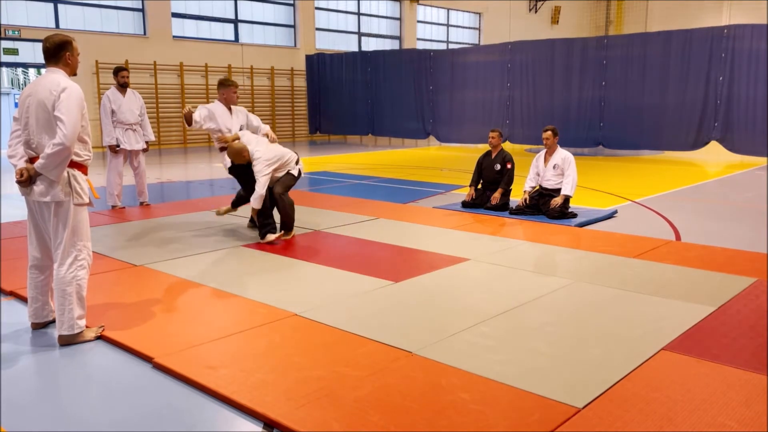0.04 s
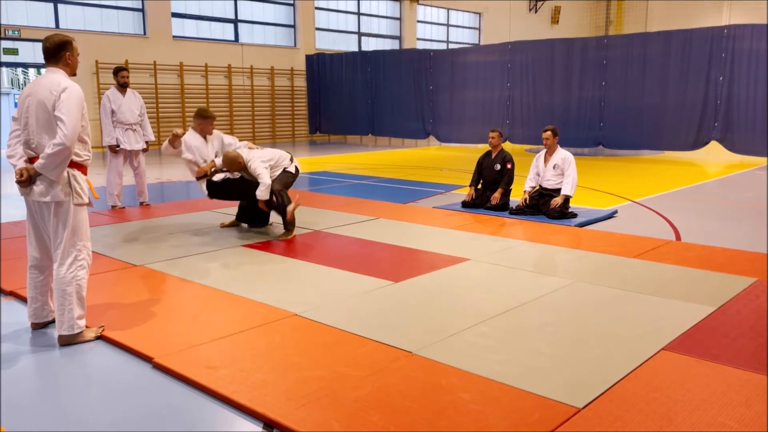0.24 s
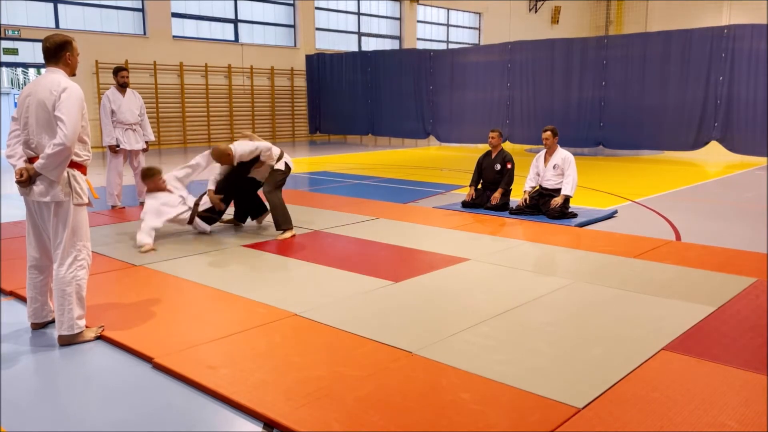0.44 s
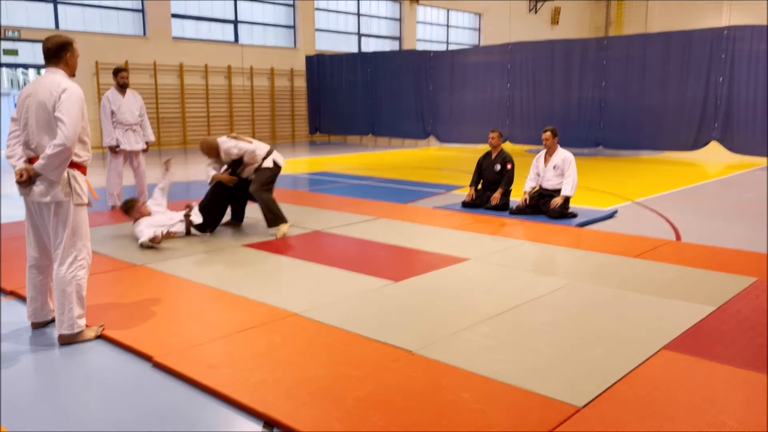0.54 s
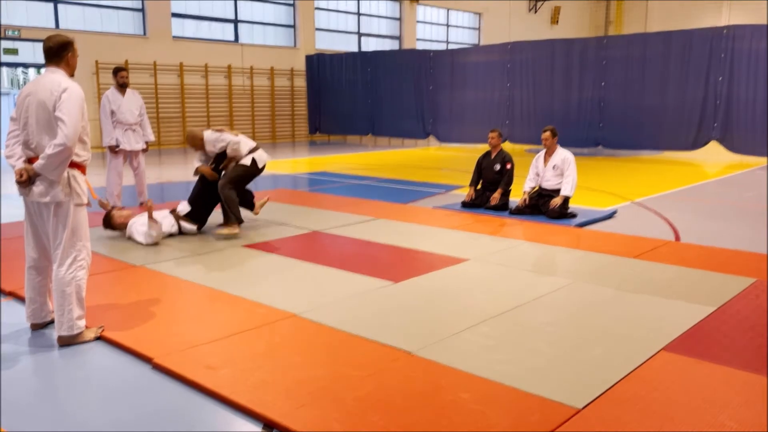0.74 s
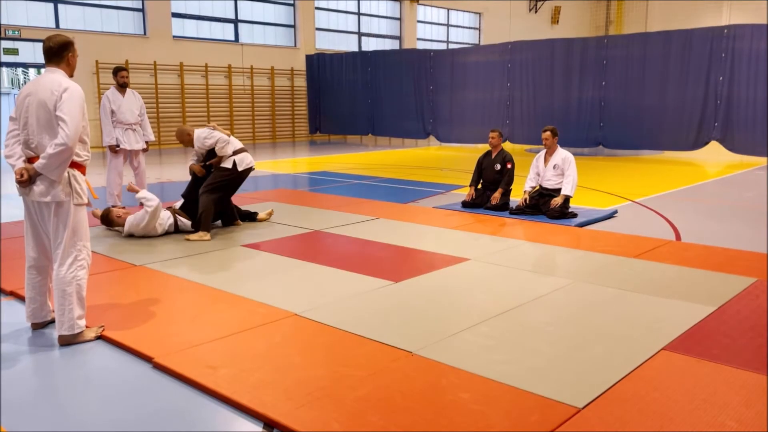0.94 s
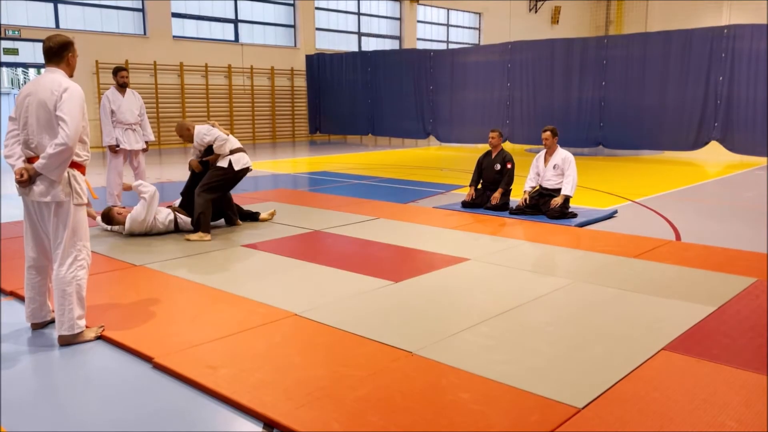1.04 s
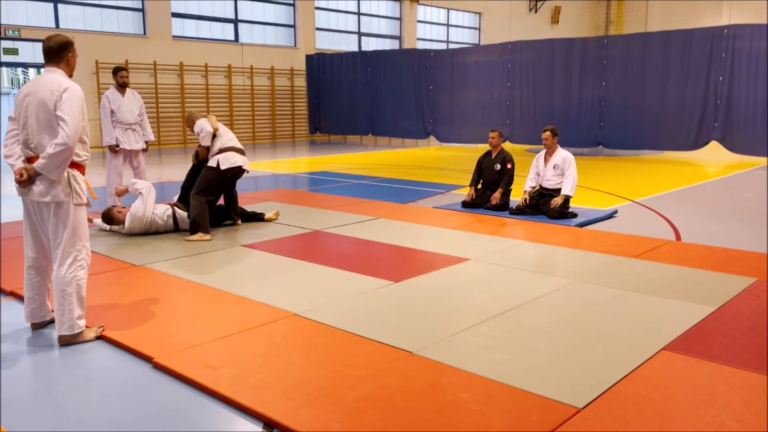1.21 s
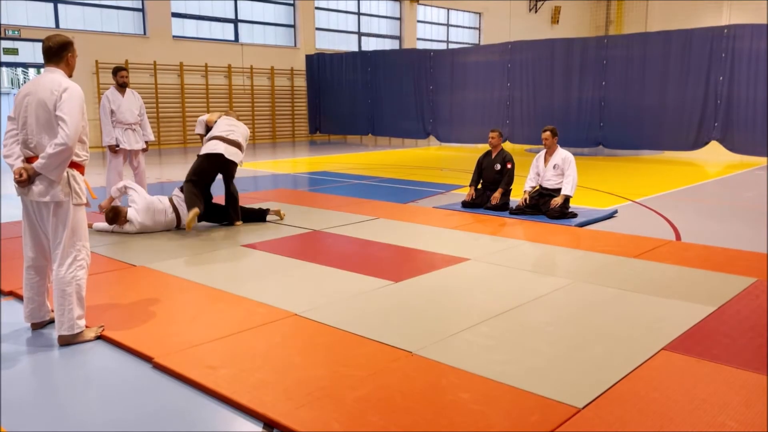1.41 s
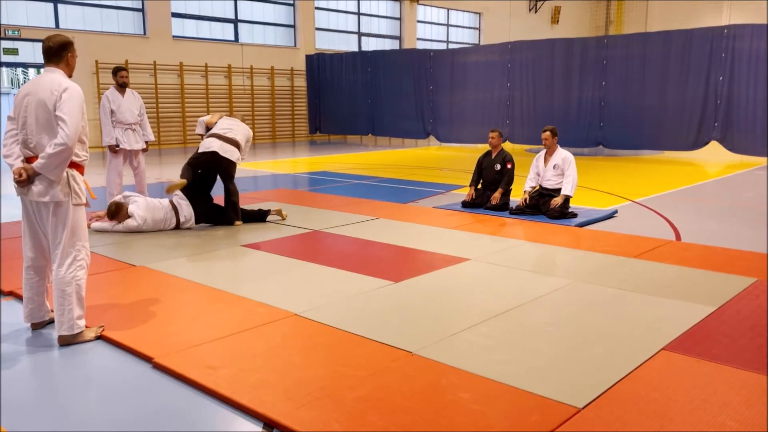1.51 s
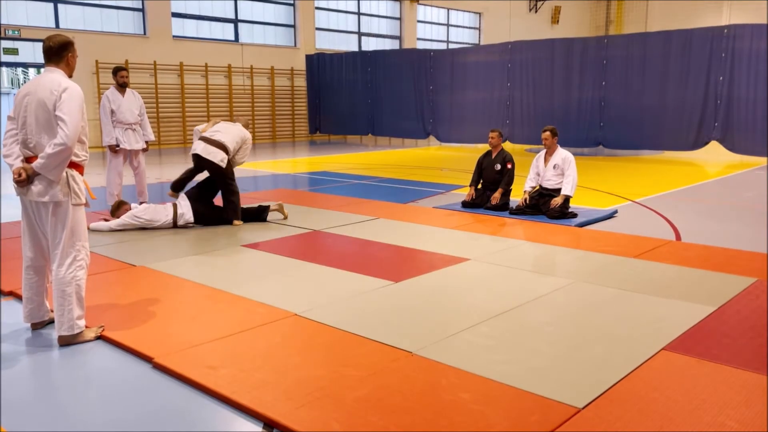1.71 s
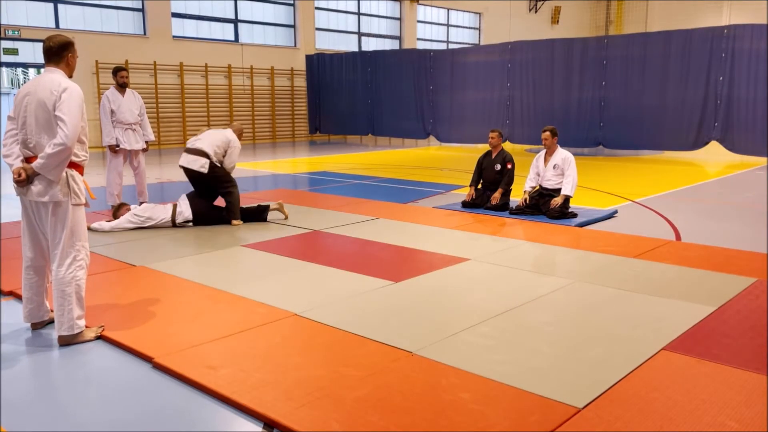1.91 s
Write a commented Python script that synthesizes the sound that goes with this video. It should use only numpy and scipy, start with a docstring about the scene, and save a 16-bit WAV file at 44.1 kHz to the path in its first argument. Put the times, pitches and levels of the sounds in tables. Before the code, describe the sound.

Loud breakfall on vinyl mats, arm slap and deep thud together, then a long boomy hall reverberation

```python
"""A body is thrown onto padded mats in a large sports hall: the arm slaps the vinyl (sharp noise bursts), the
trunk thuds on the sprung floor and softer thuds follow (short pushes that ring the mat, the floor and the
hall's low standing waves). Walls return the slap as duller bursts, and a long reverberation of fading noise
fills the hall. Cotton jackets rustle faintly (tiny ticks) as the two wrestle on, with soft low booms and faint
short tones (fading tones) before and after the fall, over the steady noise of the hall's hum."""
import sys
import numpy as np
from scipy import signal
from scipy.fft import rfft, irfft
from scipy.io import wavfile
from scipy.ndimage import uniform_filter1d

SR = 44100
rng = np.random.default_rng(int(sys.argv[2]) if len(sys.argv) > 2 else 0)


def unload_audio(sound):
    """Save the sound as a 16-bit wav file, at the path given as the first command line argument."""
    columns = np.transpose(np.atleast_2d(sound))
    # keep every value between -1 and 1, then stretch to whole-number steps
    steps = np.round(np.clip(columns, -1, 1) * 32767)
    wavfile.write(sys.argv[1], SR, steps.astype(np.int16))


N = 85995  # length in samples

# Tone of the hum. Each row: frequency in Hz, relative level in dB.
HUM_COLOUR = [(18, -2), (30, -2.5), (59, 9.5), (415, -7.5), (473, -5.5), (1810, -14), (2610, -19),
              (5450, -29), (7270, -42.5), (8080, -38.5), (12000, -42), (16000, -61)]
HUM_DB = -50

# Soft low booms and faint short tones, before and after the fall.
# Each row: start in seconds, level in dB, pitch in Hz, time to fade by 60 dB in seconds.
BOOMS = [(0.16, -37, 276, 0.054), (0.186, -34, 924, 0.018), (0.194, -37, 328, 0.12), (0.438, -18, 61, .3),
         (.485, -23, 105, 0.092), (.55, -36, 65, 0.15), (0.621, -20, 73, 0.35), (0.736, -26, 58.7, 0.3),
         (.79, -28, 105, 0.086), (0.928, -22, 61, 0.33), (1.021, -24, 67, 0.27), (1.24, -36, 60.5, .3),
         (1.427, -36, 65.9, 0.93), (1.583, -36, 62, 0.59), (1.721, -45, 55.3, 0.36),
         (1.902, -32, 238.4, 0.26)]

# Tugs on the jackets. Each row: peak in seconds, level in dB, fade in seconds, middle of its band in Hz.
RUSTLES = [(.165, -54, 0.0075, 500), (.189, -44.5, 0.0061, 940), (0.21, -55.5, 0.039, 2570),
           (0.705, -63, 0.017, 9000), (1.05, -69, 0.057, 9900), (1.165, -72, 0.022, 10000),
           (1.592, -62, .0012, 10500), (1.624, -60.5, 0.021, 6170), (1.68, -74, 0.032, 8700),
           (1.706, -64, 0.015, 6900), (1.735, -64.5, 0.014, 10700), (1.79, -70.5, 0.069, 8300)]
# Tone of the cloth. Each row: frequency in Hz, relative level in dB.
CLOTH_COLOUR = [(1500, 0), (4000, 8), (6500, 10), (7600, 2), (10500, 10), (12000, 4.5), (13500, -6),
                (16000, -9)]
FIBRES_PER_S, FIBRE_SPREAD_DB = 3500, 4  # how often fibres tick, and how uneven the ticks are
RUSTLE_OCTAVES, RUSTLE_RISE = 0.6, 0.5  # spread of a rustle's band; rise time as a share of the fade

# Palm and arm on vinyl. Each row: start in seconds, level in dB before colouring, fade time in milliseconds.
CRACKS = [(.2245, -2, 0.1), (.2254, -2, 0.78), (.2261, -17, 1), (.2282, -16.5, 1)]
SNAP = 7.0  # each crack opens with a click this many times its noise
# Tone of the slap. Each row: frequency in Hz, level in dB.
SLAP_COLOUR = [(300, -9.5), (600, 9.5), (1300, 6), (2000, 0.5), (3400, 4), (4200, -4), (5500, 4.5),
               (6900, -4.5), (8200, -3.5), (9600, -5), (11400, -3), (13000, -14), (14500, 2),
               (16000, -16.5)]
# Sideways balance of the slap. Each row: frequency in Hz, left minus right level in dB.
SLAP_PAN = [(300, -18.5), (700, 12.5), (2000, 5), (3400, 13), (4100, 25), (4900, -11.5), (5600, 1.5),
            (15000, 0)]
# Timing between the microphone ports. Each row: frequency in Hz, lead of the left port in radians.
SLAP_LEAD = [(100, 0), (700, .9), (3400, 1.4), (4100, .4), (5500, -.8), (6200, -.7), (7500, -3.6),
             (8300, -3.9), (11000, -6.3), (14500, -9.3), (16000, -10.)]
# Slap off floor, walls and roof. Each row: start in seconds, level in dB before colouring, smear in milliseconds.
ECHOES = [(.2302, -10.5, 2.3), (.2345, -12, 2.3), (.2365, -11, 0.76), (.2432, -28.5, 1.7),
          (.2485, -14.5, 1.9), (.2600, -28, 0.9), (.2690, -24.5, 12), (.2745, -19.5, 1.5),
          (.2785, -19.5, 3), (.2840, -15.5, 3.2), (.2935, -16.5, 2.6), (.2980, -21.5, 3.9)]
# Tone of the echoes. Each row: frequency in Hz, level in dB.
WALL_COLOUR = [(300, -12), (700, 3), (1250, 7), (1550, 7), (1900, -5), (2400, -1), (3500, -7), (6000, -8.5),
               (9000, -21), (12500, -16.5), (16000, -51)]

# The fall's low thuds, then softer thuds as the bodies land and settle. Each row: start in seconds, level in
# dB, contact time in milliseconds.
THUDS = [(0.2266, 1.5, 2.14), (0.2363, -9.5, 3.7), (0.2769, -7.5, 2.36), (0.282, -23, 0.91),
         (0.2950, -25, 3.9), (0.3154, -14.5, 2.1), (0.36, -22, 2.9), (0.3797, -17, 2.6), (0.429, -15, 4.6),
         (0.543, -15.5, 2.9)]
# Ringing tones of mat and floor, plus two low, long-lasting standing waves of the hall (52.8 and 65 Hz). Each
# row: pitch in Hz, level in dB, time to fade by 60 dB in seconds.
RINGING_MODES = [(52.8, -23, 1), (65, -11, 0.72), (86.3, 2.5, 0.095), (105, -10.5, 0.05), (128, -18, .07),
                 (167.5, -9.5, 0.1), (210, -16, 0.23), (238, 5, 0.068), (261.2, -20.5, 0.53), (345, -6, 0.053),
                 (715, -11, 0.14), (996, -21.5, .04), (1246, -17, 0.084)]
SWELL_CYCLES = 0.83  # time constant, in cycles, for a tone to swing up
THUD_PAN_DB = 0.4  # left minus right, for thuds and booms

# Tone of the reverberation. Each row: frequency in Hz, relative level in dB.
HALL_COLOUR = [(18, -40), (30, -15), (43, -15), (59, -3.5), (73, -1.5), (170, -6), (252, -3.5),
               (345, -14.5), (437, -16), (526, -24.5), (649, -25.5), (780, -24.5), (1070, -26.5),
               (1430, -27.5), (1960, -38), (2350, -33), (2980, -37.5), (3310, -33), (4420, -39.5),
               (5170, -36.5), (6210, -39.5), (7270, -55), (8300, -46.5), (10800, -46.5), (16000, -66)]
# How long the hall rings. Each row: frequency in Hz, time to fade by 60 dB in seconds.
HALL_T60 = [(40, 3.4), (70, 2.05), (130, 3.22), (280, 4.15), (740, 5.42), (1900, 4.75), (4000, 3.48),
            (6000, 2.18), (9000, 1.59), (14000, 0.76)]
HALL_DB, HALL_START_S = -17.5, 0.228
EARLY_DB, EARLY_T60 = -1.5, 0.35  # an added early part: level over the late part, extra fade in seconds
HALL_BUILD_S, BUILD_CURVE = 0.049, 0.67  # how fast the hall fills, and the bend of that rise
BASS_BUILD_S, BASS_HZ = 0.04, 330  # the boom below this pitch starts more gently
STEADY_HZ, STEADY_SHARE = (120, 400), 0.3  # in this band the hall swells less

# Width of the hall and hum. Each row: frequency in Hz, side minus middle level in dB.
WIDTH = [(60, -46.5), (110, -12.5), (200, -11.5), (380, -3.5), (700, 0.5), (1290, -0.5), (2380, -4),
         (4400, -5.5), (8120, 9.5), (15000, -39.5)]
# Sideways balance of the hall and hum. Each row: frequency in Hz, left minus right level in dB.
HALL_PAN = [(60, -2.5), (110, 1), (200, 0), (380, 1.0), (700, 0.5), (1290, 0.5), (2380, 1.5), (4400, 3),
            (8120, 0.5), (15000, 1.5)]
PATCH_DB = 2  # typical rise and dip of narrow bands of that noise

MIC_LOW_HZ, CEILING, EDGE_HZ = 40, 0.95, 16300  # bass roll-off in Hz, overload ceiling, top of the band in Hz


def amp(db):
    """Turns decibels into a plain multiplier."""
    return 10 ** (np.asarray(db) / 20)


def evened(x):
    """Scales a sound to an average (RMS) level of one."""
    return x / np.sqrt(np.mean(x ** 2) + 1e-20)


def read(points, hz):
    """Reads a table at any frequency, with straight lines over a logarithmic pitch scale."""
    f, value = np.transpose(points)
    return np.interp(np.log(hz + 1), np.log(f + 1), value)


def add(mix, start_s, sound):
    """Lays a sound into the mix at its start time, cut off at the end."""
    part = mix[round(start_s * SR):][:len(sound)]
    part += sound[:len(part)]


def coloured(x, colour, pan=((0, 0), (1, 0)), lead=((0, 0), (1, 0))):
    """Filters causally (nothing rings before its start) and spreads to two microphone ports."""
    hz = np.fft.rfftfreq(N, 1 / SR)
    side = np.array([[0.5], [-0.5]])
    log_gain = np.log(amp(read(colour, hz)))
    # The phase that makes the filter causal follows from its gain.
    mirrored = np.r_[log_gain, log_gain[:0:-1]]
    phase = -signal.hilbert(mirrored).imag[:len(hz)] + side * read(lead, hz)
    balance = amp(side * read(pan, hz))
    return irfft(rfft(x) * balance * np.exp(log_gain + 1j * phase), N)


def diffuse(level_db, size):
    """Noise from all around; level_db(hz, t) shapes it, and its middle and side are unrelated."""
    hop = size // 4
    hz = np.fft.rfftfreq(size, 1 / SR)[:, None]
    t = np.arange(N // hop + 5) * hop / SR
    a, b, c, d, patches = rng.standard_normal((len(t), len(hz), 5)).T
    # Smooth the patches over pitch, then over time.
    patches = uniform_filter1d(patches, size=2, axis=0)
    patches = evened(uniform_filter1d(patches, size=16, axis=1))
    patch_db = PATCH_DB * patches * (hz > STEADY_HZ[1])
    mid = a + 1j * b
    side = (c + 1j * d) * amp(read(WIDTH, hz))
    pan = read(HALL_PAN, hz) / 2
    ports = np.array([(mid + side) * amp(pan), (mid - side) * amp(-pan)])
    ports = ports * amp(level_db(hz, t) + patch_db)
    return signal.istft(ports, nperseg=size, noverlap=size - hop)[1][:, :N]


def hum():
    """Steady ventilation rumble of the hall, made of coloured noise."""
    def level_db(hz, t):
        return read(HUM_COLOUR, hz) + 0 * t
    return amp(HUM_DB) * evened(diffuse(level_db, size=2048))


def swing(hz, db, t60):
    """A tone that swings up quickly at one pitch and dies away."""
    t = np.arange(N) / SR
    rise = -np.expm1(-t * hz / SWELL_CYCLES)
    return amp(db - 60 * t / t60) * np.sin(2 * np.pi * hz * t) * rise


def thud_panned(x):
    """Places a sound slightly to the left."""
    return x * amp([[THUD_PAN_DB / 2], [-THUD_PAN_DB / 2]])


def booms():
    """Each boom or short tone is one fading tone."""
    out = np.zeros(N)
    for start_s, db, hz, t60 in BOOMS:
        add(out, start_s, swing(hz, db, t60))
    return thud_panned(out)


def cloth():
    """Fibre ticks of uneven size swell with each tug on the jackets, each tug in its own band."""
    t, hz = np.arange(N) / SR, np.fft.rfftfreq(N, 1 / SR) + 1
    size_db = FIBRE_SPREAD_DB * np.minimum(rng.exponential(1, (2, N)), 3)
    happens = rng.random((2, N)) < FIBRES_PER_S / SR
    ticks = amp(size_db) * happens * rng.choice([-1.0, 1.0], (2, N))
    spectrum = rfft(coloured(ticks, CLOTH_COLOUR))
    out = np.zeros((2, N))
    for peak_s, db, fade_s, centre_hz in RUSTLES:
        band = np.exp(-0.5 * (np.log2(hz / centre_hz) / RUSTLE_OCTAVES) ** 2)
        spread_s = fade_s * np.where(t < peak_s, RUSTLE_RISE, 1)
        tug = np.exp(-0.5 * ((t - peak_s) / spread_s) ** 2)
        out += evened(irfft(spectrum * band, N)) * amp(db) * tug
    return out


def bursts(rows, snap=0):
    """Short decaying bursts of noise, each opening with a click if snap is set."""
    x, t = np.zeros(N), np.arange(800) / SR
    grains = rng.standard_normal((len(rows), 800))
    for (start_s, db, ms), grain in zip(rows, grains):
        grain = (grain - snap * (t == 0)) * np.exp(-t * 1000 / ms)
        # A longer burst gets more energy.
        strength = np.sqrt(ms * SR / 2000)
        add(x, start_s, amp(db) * grain / np.linalg.norm(grain) * strength)
    return x


def slap():
    """Sharp cracks of arm on vinyl, then duller echoes whose noise differs at each port."""
    cracks = coloured(bursts(CRACKS, SNAP), SLAP_COLOUR, SLAP_PAN, SLAP_LEAD)
    echoes = [coloured(bursts(ECHOES), WALL_COLOUR)[0] for port in "LR"]
    return cracks + echoes


def thuds():
    """Each thud is a rounded push, as long as the contact, that rings the mat and floor and the hall's low
    standing waves."""
    push = np.zeros(N)
    for start_s, db, ms in THUDS:
        bump = np.hanning(round(ms * SR / 1000) + 2)
        add(push, start_s, amp(db) * bump / bump.sum())
    ringing = sum(swing(*mode) for mode in RINGING_MODES)
    return thud_panned(signal.fftconvolve(push, ringing)[:N])


def steadied(x):
    """Partly evens out the chance swells of the low band, one narrow strip at a time."""
    z = signal.stft(x, nperseg=2048)[2]
    power = uniform_filter1d((abs(z) ** 2).mean(0), size=3, axis=0) + 1e-20
    usual = uniform_filter1d(power, size=11, axis=1)
    hz = np.fft.rfftfreq(2048, 1 / SR)[:, None]
    low = (hz > STEADY_HZ[0]) & (hz < STEADY_HZ[1])
    gain = (usual / power) ** (STEADY_SHARE * low / 2)
    return signal.istft(z * gain, nperseg=2048)[1][:, :N]


def hall():
    """Reverberation builds up from the fall, while each band dies at its own speed."""
    def level_db(hz, t):
        age = np.maximum(t - HALL_START_S, 0)
        early = 1 + amp(EARLY_DB - 60 * age / EARLY_T60)
        return read(HALL_COLOUR, hz) - 60 * age / read(HALL_T60, hz) + 20 * np.log10(early)
    tail = steadied(diffuse(level_db, size=2048))
    # The first quarter second, before the build-up is applied, sets the level.
    first = tail[:, round(HALL_START_S * SR):][:, :SR // 4]
    age = np.maximum(np.arange(N) / SR - HALL_START_S, 0)
    bass = signal.sosfiltfilt(signal.butter(2, BASS_HZ, fs=SR, output="sos"), tail)
    bass_build = -np.expm1(-(age / BASS_BUILD_S) ** 2)
    rest_build = -np.expm1(-(age / HALL_BUILD_S) ** BUILD_CURVE)
    grown = bass * bass_build + (tail - bass) * rest_build
    return amp(HALL_DB) * grown / np.sqrt(np.mean(first ** 2))


def scene():
    """Adds all the sounds of the hall together."""
    return hum() + booms() + cloth() + slap() + thuds() + hall()


def record(dry):
    """Bass roll-off of the microphone, soft overload of the input stage, then the band limit."""
    thin = signal.sosfilt(signal.butter(4, MIC_LOW_HZ, "high", fs=SR, output="sos"), dry)
    soft = CEILING * np.tanh(thin / CEILING)
    band_limit = signal.firwin(511, EDGE_HZ, window=("kaiser", 9), fs=SR)
    return signal.oaconvolve(soft, band_limit[None], "same")


dry = scene()
out = record(dry)
unload_audio(out)
```